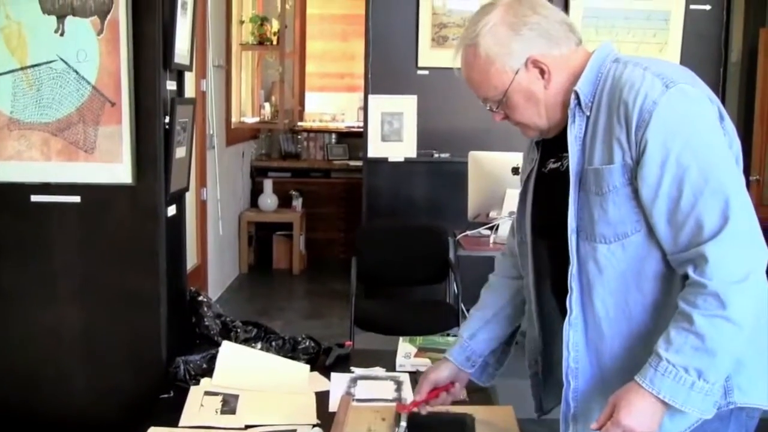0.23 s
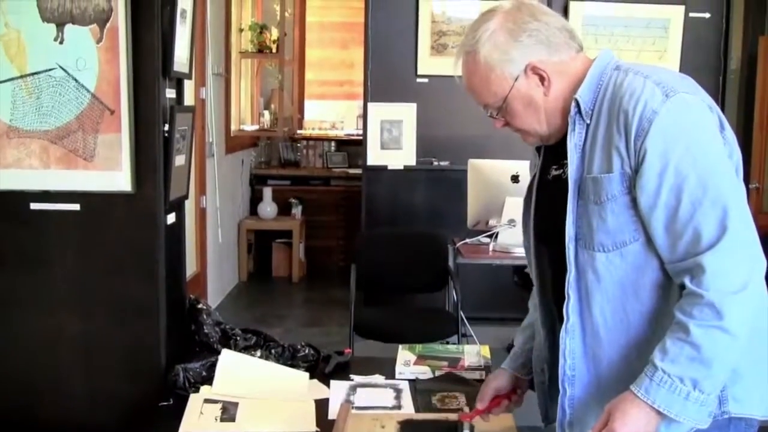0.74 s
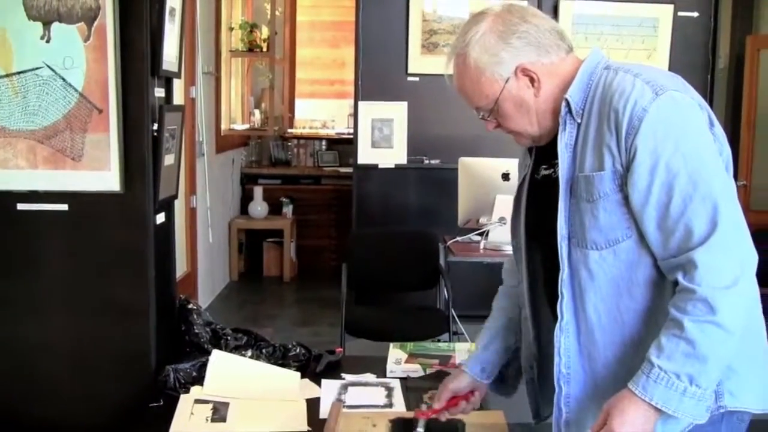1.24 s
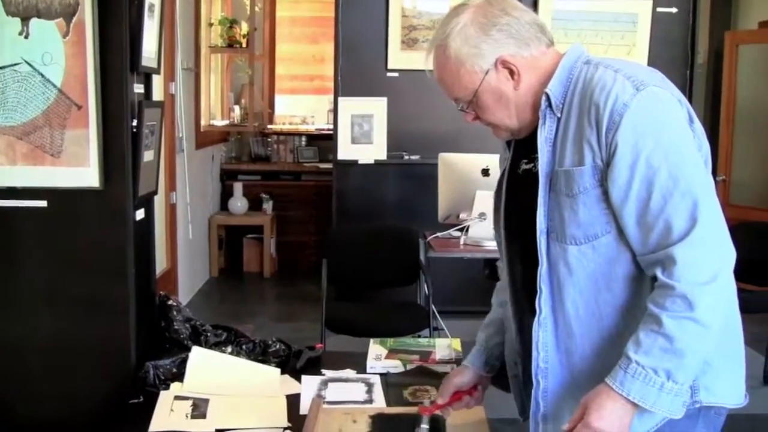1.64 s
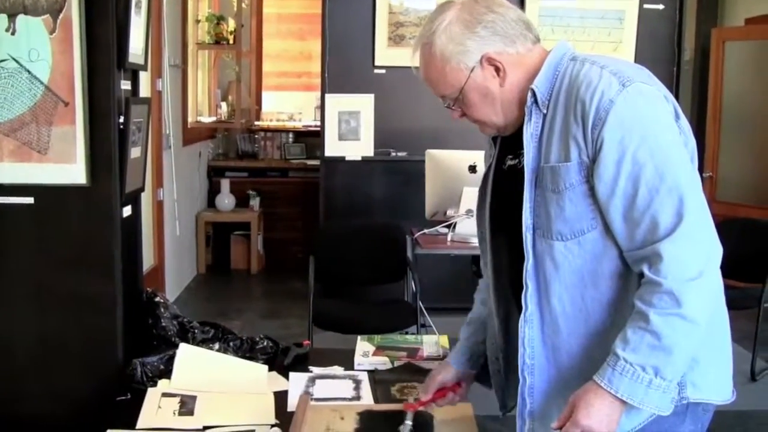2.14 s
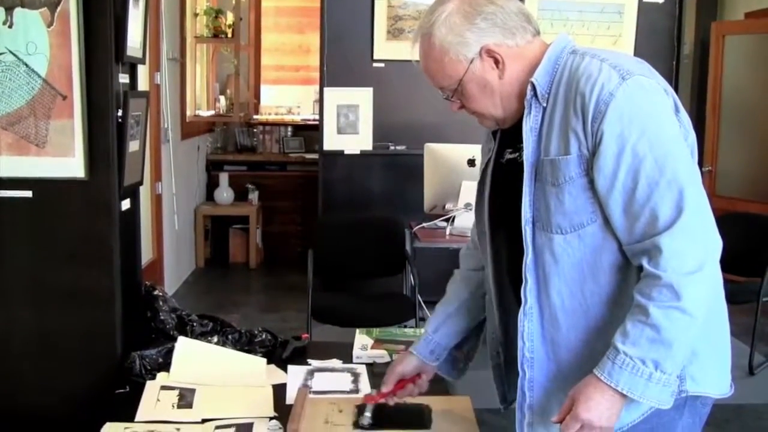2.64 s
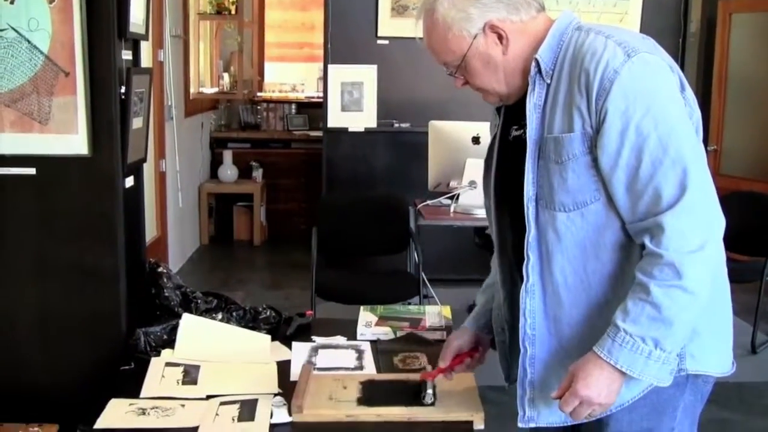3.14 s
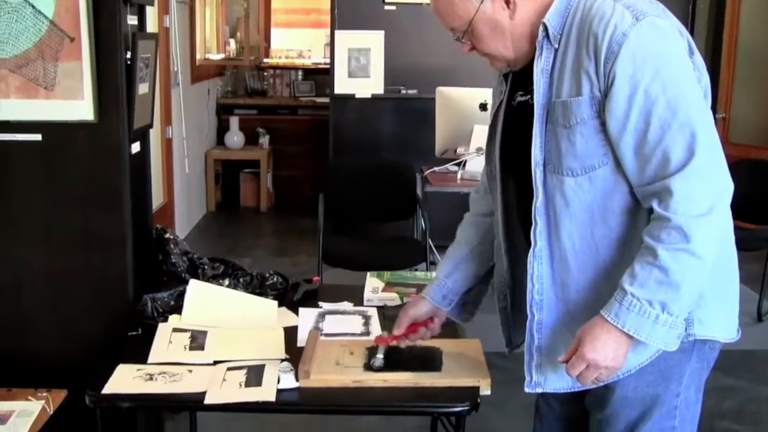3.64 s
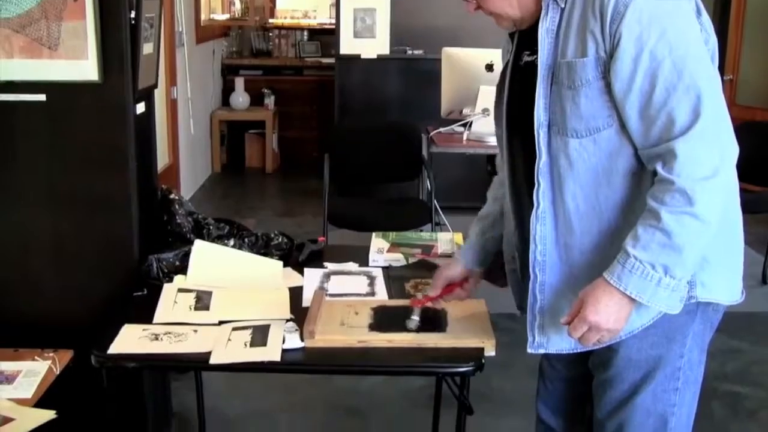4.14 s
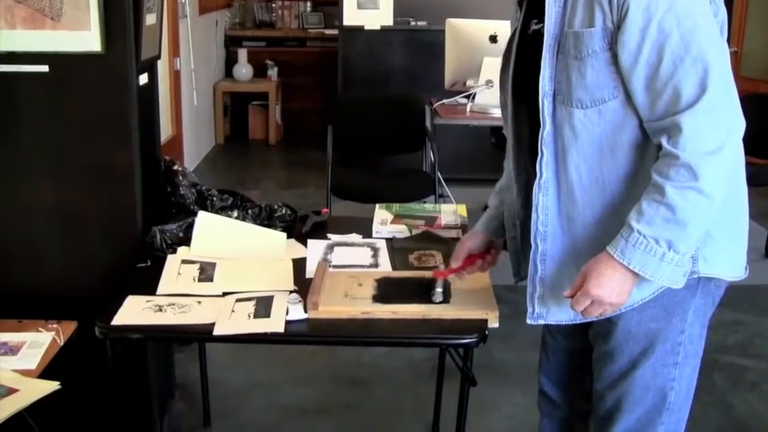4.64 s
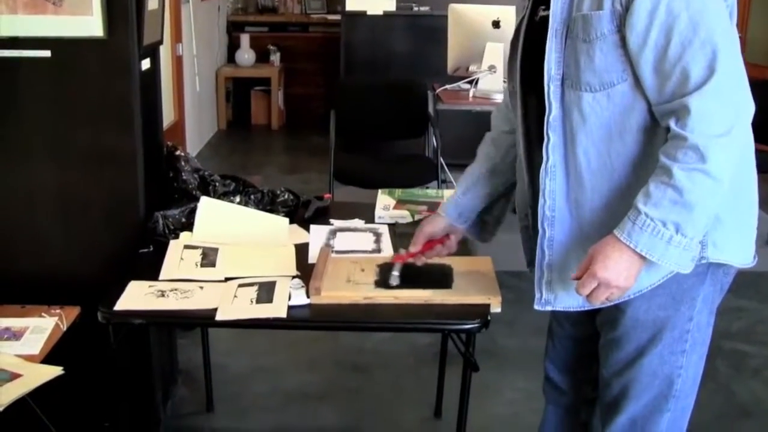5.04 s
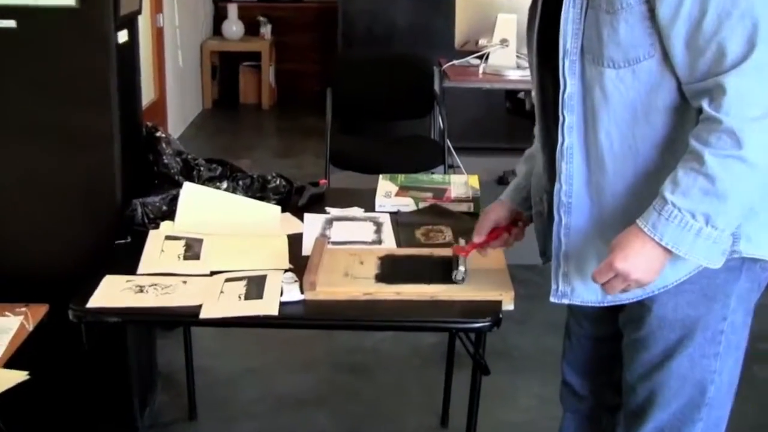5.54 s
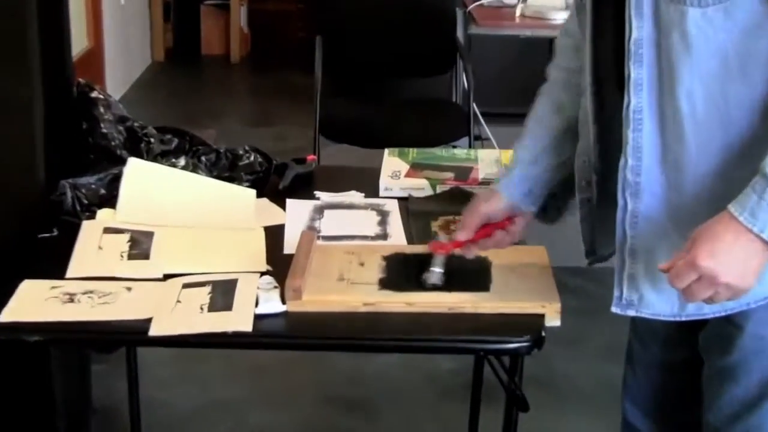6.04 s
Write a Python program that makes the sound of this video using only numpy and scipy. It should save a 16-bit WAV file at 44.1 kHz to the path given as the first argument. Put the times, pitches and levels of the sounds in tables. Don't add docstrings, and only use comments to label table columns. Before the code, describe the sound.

The sound begins mid-stroke: a rubber roller moves through tacky ink, making a bright, sticky hiss of tiny snaps, roughly one stroke every 0.4 seconds, pushes and pulls differing slightly in tone and width. A faint wooden rumble lies beneath. A soft knock comes at 0.3 s and a clearer one with a table thud at 0.8, followed by small axle ticks off to one side around 0.9, 1.0 and 1.9. From 2 to 3 s mostly smooth swishes. A knock at 3.15 leads to the loudest crack at 3.3; more hard raps of metal frame on board fall at 4.1, 4.9 and 5.6, with lighter ones between and a last at about 6.25. The folding table thuds dully under heavier landings. The close stereo microphone hears hits ring briefly through a large hard-floored workshop over quiet, steady ventilation, stopping while the rolling continues.

```python
import sys
import numpy as np
from scipy import signal
from scipy.fft import rfft, irfft
from scipy.io import wavfile
from scipy.ndimage import uniform_filter1d

SR = 44100
rng = np.random.default_rng(int(sys.argv[2]) if len(sys.argv) > 2 else 0)


def invert_db(level):
    return 10 ** (np.asarray(level, dtype=float) / 20)


def to_wav(s):
    ch = np.atleast_2d(s).T
    pcm = np.round(np.clip(ch, -1, 1) * 32767)
    wavfile.write(sys.argv[1], SR, pcm.astype(np.int16))


N = 277168


def evened(x):
    return x / np.sqrt(np.mean(x ** 2) + 1e-20)


def slow_noise(n, size):
    once = uniform_filter1d(rng.standard_normal(n), size=size)
    return evened(uniform_filter1d(once, size=size))


def read(points, hz):
    f, value = np.transpose(points)
    return np.interp(np.log(hz + 1), np.log(f + 1), value)


def add(mix, s, sound):
    part = mix[..., round(s * SR):][..., :sound.shape[-1]]
    part += sound[..., :part.shape[-1]]


def ports(a, b, colour, side, turned):
    hz = np.fft.rfftfreq(N, 1 / SR)
    tint = invert_db(read(colour, hz))
    mid = rfft(evened(a)) * tint
    other = rfft(evened(b)) * tint
    wide = invert_db(read(side, hz)) * (turned * 1j * mid + np.sqrt(1 - turned ** 2) * other)
    mid, wide = irfft(mid, N), irfft(wide, N)
    return np.array([mid + wide, mid - wide]) / np.std(mid)


def snaps(per_s, spread_db):
    fine = evened(uniform_filter1d(rng.standard_normal(N), size=150))
    clumps = invert_db(0.55 * fine) * invert_db(0.86 * slow_noise(N, 1500))
    size = invert_db(spread_db * np.minimum(rng.exponential(1, N), 5)) * rng.choice([-1., 1.], N)
    return clumps * size * (rng.random(N) < per_s / SR)


def stroke_gain(strokes, column, slope_db, brake):
    grip, brake_db_per_s, knee_s = 3.15, 180, 0.0089
    gain, t = np.zeros(N), np.arange(N) / SR
    for row in strokes:
        start_s, brake_s, speed_up_s = row[:3]
        u = np.clip(t - start_s, 0, 1)
        late_s = knee_s * np.logaddexp(0, (u - brake_s) / knee_s)
        level_db = row[column] + slope_db * u - brake * brake_db_per_s * late_s
        gain += (1 - np.exp(-u / speed_up_s)) ** grip * invert_db(level_db)
    return uniform_filter1d(gain, size=200)


# start t/s, time until braking t/s, speed-up t/s,
# ink hiss level/dB, board rumble level/dB
STROKES = [(-.100, 0.28, 0.057, -54.5, -55.5), (.337, .335, 0.026, -53, -56),
           (.778, .290, 0.022, -51.5, -73), (1.200, 0.31, 0.019, -52, -55),
           (1.610, 0.29, 0.016, -52.5, -60), (1.978, 0.35, 0.029, -52.5, -77),
           (2.425, 0.29, 0.02, -52.5, -63), (2.817, 0.33, 0.023, -53, -66),
           (3.270, 0.31, 0.007, -52, -55.5), (3.656, 0.3, 0.03, -51, -55.5),
           (4.097, 0.27, 0.0025, -52, -54.5), (4.427, 0.32, 0.031, -51.5, -54),
           (4.858, 0.27, 0.012, -51.5, -51.5), (5.218, 0.29, 0.032, -51, -50),
           (5.628, 0.27, 0.016, -51, -59), (6.003, .245, 0.026, -51.5, -52)]
# f/Hz, level/dB per Hz
PUSH_COLOUR = [(710, -20), (1200, -1), (1800, -0.5), (2450, -3), (3550, -5.5), (4500, -10), (8400, -2.5),
               (10500, -2), (13000, -8), (15600, -12), (16000, -50)]
# f/Hz, level/dB per Hz
PULL_COLOUR = [(710, -11), (1200, -6), (1900, -0.5), (2500, -4.5), (3800, -5.5), (5000, -7.5), (8100, -1.5),
               (10600, -1.5), (13500, -9), (14500, -12.5), (15700, -40), (16000, -75)]
# f/Hz, side minus mid level/dB
PUSH_SIDE = [(2000, -9.5), (4000, -14), (8000, -13.5), (10500, -4.5), (13000, 0.5), (16000, -11)]
# f/Hz, side minus mid level/dB
PULL_SIDE = [(2000, -12), (4000, -27), (7000, -5), (10000, -1.5), (13000, 9), (14500, 6), (15700, 18)]


def ink():
    push = ports(snaps(20000, 1.6), snaps(20000, 2.7), PUSH_COLOUR, PUSH_SIDE, .25)
    pull = ports(snaps(20000, 1.9), snaps(20000, 2.5), PULL_COLOUR, PULL_SIDE, .5)
    push_gain = invert_db(2.5) * stroke_gain(STROKES[0::2], column=3, slope_db=-0.5, brake=0.91)
    pull_gain = invert_db(2.17) * stroke_gain(STROKES[1::2], column=3, slope_db=-0.5, brake=0.93)
    return push_gain * push + pull_gain * pull


# f/Hz, level/dB, t60 t/s
TABLE_MODES = [(258, 0, .08), (295, -1, .07), (370, -4, .05), (440, -7, .05)]
# f/Hz, level/dB, t60 t/s
BASE_MODES = [(540, -11, .06), (612, 0, .08), (690, -7, .06), (790, -7, .05), (890, 0, .06), (955, -5, .06),
              (1085, -2, .06), (1215, 0, .05), (1290, -4, .05), (1530, 0, .04), (1740, -7, .04)]
# f/Hz, level/dB, t60 t/s
FRAME_MODES = [(2000, -3, .03), (2350, -6, .03), (2620, -4, .04), (2970, -9, .04), (3300, -1, .03),
               (3600, -7, .03), (3950, -9, .02)]
BOARD_MODES = TABLE_MODES + BASE_MODES + FRAME_MODES


def rumble():
    t = np.arange(3000) / SR
    body = np.zeros(len(t))
    for hz, db, t60 in BOARD_MODES:
        body += invert_db(db - 1.4 * hz / 1000 - 90 * t / t60) * np.sin(2 * np.pi * hz * t)
    shaken = signal.oaconvolve(snaps(1500, 3.1), body)[:N]
    return stroke_gain(STROKES, column=4, slope_db=-12, brake=1) * evened(shaken)


PART_BORDERS = [450, 800, 1150, 1400, 1900]
# f/Hz, level/dB per Hz
CRACK_COLOUR = [(800, -78), (2000, 14), (3300, 32), (4500, 3), (7000, -20), (12000, -39), (16000, -47)]


def knock(peak_db, low_db, high_db, frame_db):
    t = np.arange(4000) / SR
    draw = rng.standard_normal(len(t))
    hz, db, t60 = np.transpose(BOARD_MODES)[:, :, None]
    upper_db = (high_db + frame_db) / 2 + 0.45
    part_db = np.array([-26, low_db, -6.0, high_db, upper_db, frame_db])[np.searchsorted(PART_BORDERS, hz)]
    level = db + part_db + 1.6 * draw[:len(hz), None]
    decay_db = np.where(hz > PART_BORDERS[-1], 100, 25) * t / t60
    phase = hz * t + 0.14 * draw[-len(hz):, None]
    ring = invert_db(level - decay_db) * np.sin(2 * np.pi * phase)
    choke = np.interp(t, [0, .0012, .0075, .0095, .03, .09], [0, .9, 1.1, .2, .06, 0])
    sound = (ring * choke).sum(0)
    strike = np.exp(-t / 0.0012)
    rebound = .5 * (t > .0035) * np.exp(-abs(t - .0035) / 0.0012)
    tint = invert_db(read(CRACK_COLOUR, np.fft.rfftfreq(len(t), 1 / SR)))
    crack = irfft(rfft(draw * (strike + rebound)) * tint, len(t)) * (t < .03)
    sound = sound / abs(sound).max() + invert_db(frame_db + 1) * crack / abs(crack).max()
    sound[[12, 13, 185, 186]] += invert_db(frame_db + .8 * peak_db + 6) * np.array([1, -1, .6, -.6])
    return invert_db(peak_db) * sound


# t/s, peak level/dB, # then low board, high board and frame level/dB against
KNOCKS = [(0.335, -39.5, 3, -10, -32), (0.777, -22.5, -9.5, -9.5, -11), (1.211, -37.5, 1, -19, -26),
          (1.519, -50, -21, -22, -25), (3.148, -27.5, -21, -11.5, -19.5), (3.276, -8, -8.5, -5.5, -10.5),
          (3.576, -32.5, -14, -19, -28), (3.975, -38, -3, -13, -17), (4.102, -12, -6.5, -8, -13),
          (4.745, -34.5, -13.5, -27, -34), (4.871, -16.5, -4.5, -6, -23), (5.233, -28, 2, -19, -24),
          (5.644, -10.5, -11, -0.5, -15.5), (6.257, -26.5, -11, -9.5, -18.5)]
# t/s, peak, low, high and # frame level/dB
TOUCHES = [
    (3.262, -34.5, -2, -12, -15),
    (4.078, -35, -14, -21, -4),
    (5.628, -27.5, 2, -12, -8),
    (4.3, -24, -1, -10, -14),
]


def frame_knocks():
    out = np.zeros(N)
    for s, *levels in KNOCKS + TOUCHES:
        add(out, s, knock(*levels))
    return out


def thud(peak_db):
    t = np.arange(4000) / SR
    hz, db, t60 = np.transpose(TABLE_MODES)[:, :, None]
    level = db + 2 * rng.standard_normal((len(hz), 1))
    ring = (invert_db(level - 70 * t / t60) * np.sin(2 * np.pi * hz * t)).sum(0)
    sound = ring * np.interp(t, [0, .006, .02, .05], [0.15, 0.41, 0.55, 0])
    return invert_db(peak_db) * sound / abs(sound).max()


# t/s, peak level/dB
THUDS = [(.335, -42), (0.779, -30), (1.209, -41), (1.519, -41), (3.277, -38.5), (3.975, -40), (4.103, -36),
         (4.872, -31.5), (5.234, -40), (5.644, -27), (6.256, -39.5)]


def table_thuds():
    out = np.zeros(N)
    for s, peak_db in THUDS:
        add(out, s, thud(peak_db))
    return out


def tick(ring_db, hz, snap_db):
    t = np.arange(1200) / SR
    sweep = np.cumsum(hz + 3000 * np.exp(-t / .002)) / SR
    snap = invert_db(snap_db) * np.exp(-t / .0018) * np.sin(2 * np.pi * sweep)
    swell = invert_db(ring_db - 1) * t / .0021 * np.exp(1 - t / .0021)
    tone = .65 * np.sin(2 * np.pi * hz * t) + .2 * np.sin(2 * np.pi * 1900 * t + 1)
    ring = swell * (tone + .3 * slow_noise(len(t), 9))
    wide = np.roll(ring, 8)
    return np.array([snap + ring + wide, snap + ring - wide])


# t/s, ring level/dB, ring f/Hz, snap level/dB
TICKS = [
    (.8975, -27, 880, -32),
    (.9668, -30, 1250, -36),
    (1.4445, -43, 960, -43),
    (1.9213, -33, 1150, -33),
    (2.3498, -43, 1100, -36),
    (2.709, -46, 900, -48),
]


def axle_ticks():
    out = np.zeros((2, N))
    for s, *settings in TICKS:
        add(out, s, tick(*settings))
    return out


# t/s, level/dB
ECHOES = [
    (.011, -11),
    (.0175, -6.5),
    (.0235, -8),
    (.031, -13),
    (.040, -9),
    (.052, -13),
]
# f/Hz, t60 t/s
ROOM_T60 = [(120, 0.82), (500, 0.98), (1400, 0.89), (3700, 0.69), (8000, 0.67), (16000, 0.24)]


def room(x, echo_db, tail_db):
    taps = np.zeros((2, SR))
    at = np.arange(500, SR - 20, 20) + rng.integers(0, 20, (2, (SR - 501) // 20))
    np.put_along_axis(taps, at, rng.choice([-1., 1.], at.shape), 1)
    hz, t, z = signal.stft(taps, SR, nperseg=256)
    decay = invert_db(-60 * t / read(ROOM_T60, hz)[:, None])
    build_up = np.clip(t / 0.044, 0, 1)
    band = (hz < 14200)[:, None]
    mid, wide = signal.istft(z * decay * build_up * band, SR, nperseg=256)[1]
    tail = invert_db(tail_db) * np.array([mid + 0.23 * wide, mid - 0.13 * wide]) / np.linalg.norm(mid)
    dull = np.exp(-np.arange(60) / 2.8)
    for s, db in ECHOES:
        add(tail, s, invert_db(db + echo_db) * np.tile(dull / dull.sum(), (2, 1)))
    return signal.fftconvolve(x[None], tail, axes=1)[:, :N]


# f/Hz, level/dB per Hz
AIR_COLOUR = [(25, -52), (42, -45), (58, -16.5), (72, -24.5), (120, -14.5), (260, -8), (420, -8.5),
              (800, -6.5), (1200, -13), (1900, -22.5), (3400, -31), (8600, -38), (13000, -48), (16000, -68)]
# f/Hz, side minus mid level/dB
AIR_SIDE = [(30, -9), (70, -36), (150, -7), (500, -5.5), (1700, -6.5), (5000, 0.5), (15000, 5)]


def air():
    a, b = rng.standard_normal((2, N))
    swell = invert_db(1.25 * slow_noise(N, 3000))
    return invert_db(-50) * swell * ports(a, b, AIR_COLOUR, AIR_SIDE, .05)


def scene():
    thin = signal.butter(2, 150, "high", fs=SR, output="sos")
    hits = frame_knocks() + table_thuds()
    ticks = signal.sosfilt(thin, axle_ticks())
    hiss = ink()
    board = signal.sosfilt(thin, hits + rumble())
    near = np.array([board, np.roll(board, 1)])
    struck = board + ticks.mean(0) / 8
    turn = 2 * np.pi * .31 * np.arange(N) / SR
    wet = room(struck * np.cos(turn) ** 2, 0, -5.8) + room(struck * np.sin(turn) ** 2, 0, -4.83)
    wet = wet + room(hiss.mean(0), -13, -15)
    return near + ticks + hiss + wet + air()


def roll_off(x):
    return signal.sosfilt(signal.butter(12, 16650, fs=SR, output="sos"), x)


def record(dry):
    edge = signal.firwin(255, 16400, window=("kaiser", 8), fs=SR)
    mix = signal.oaconvolve(dry * invert_db([[.3], [-.3]]), edge[None], "same")
    return roll_off(mix)


dry = scene()
out = record(dry)
to_wav(out)
```